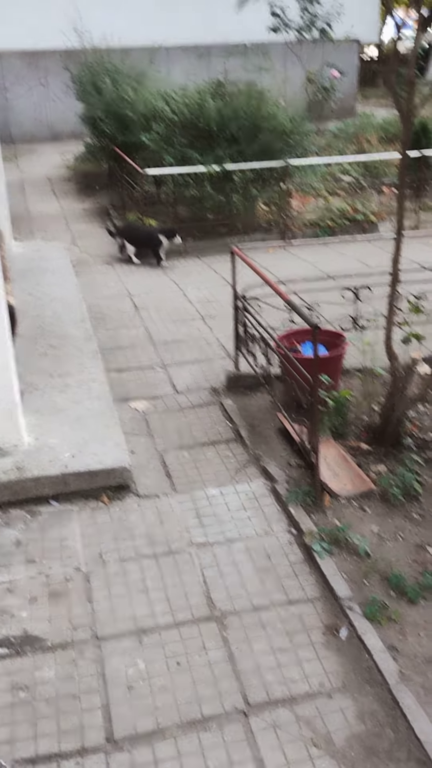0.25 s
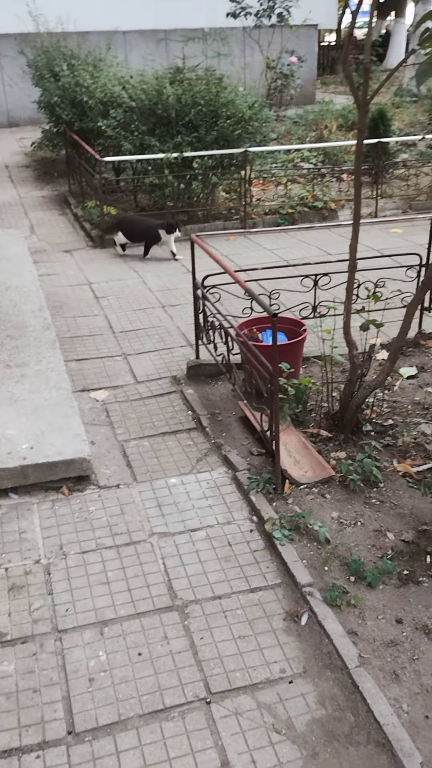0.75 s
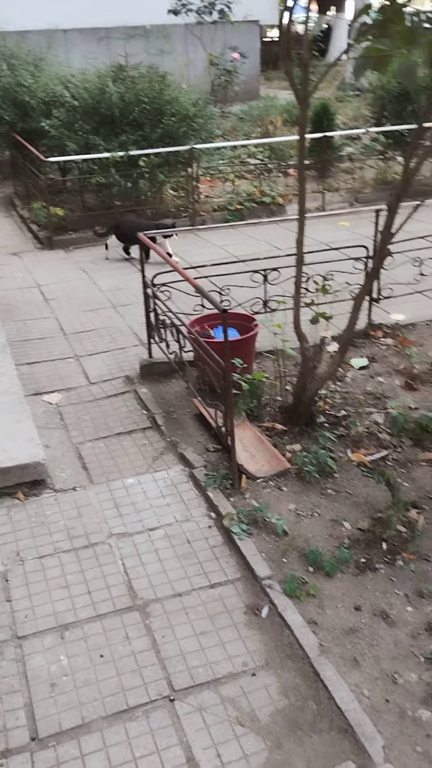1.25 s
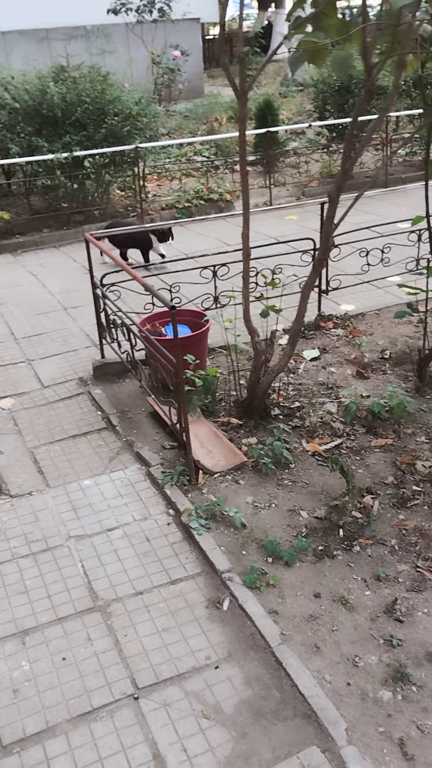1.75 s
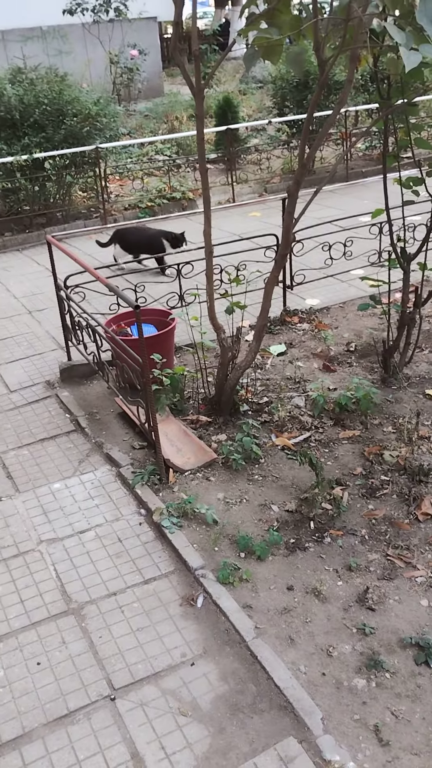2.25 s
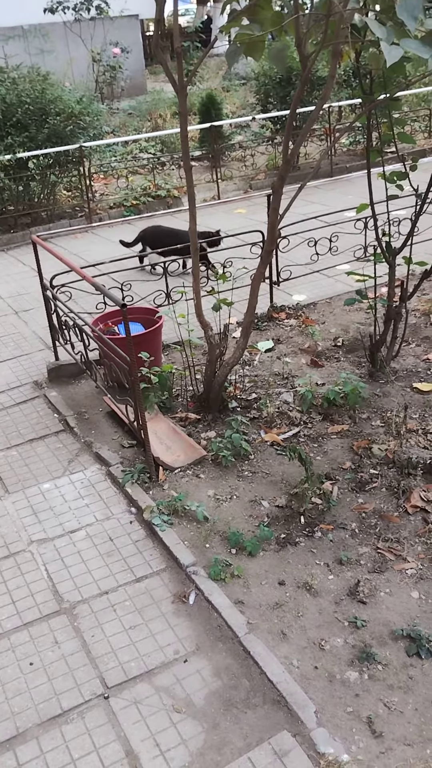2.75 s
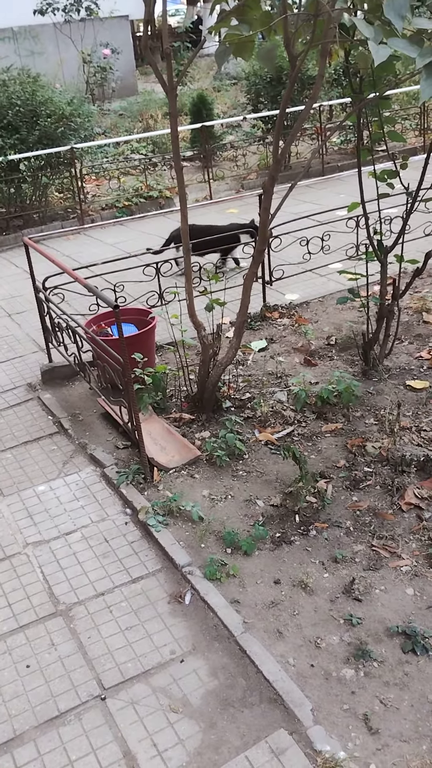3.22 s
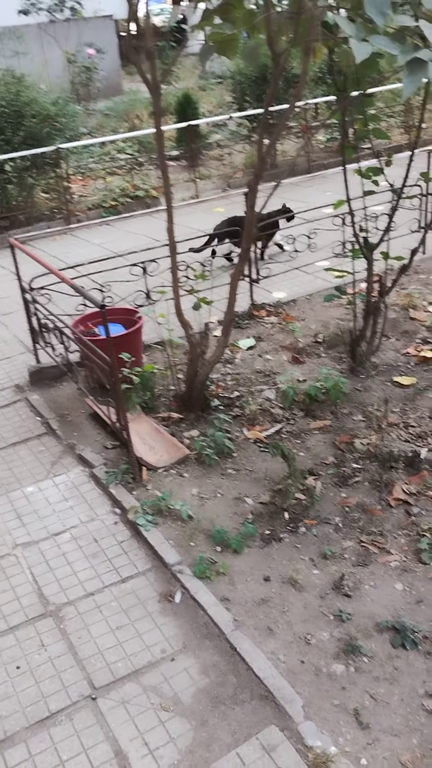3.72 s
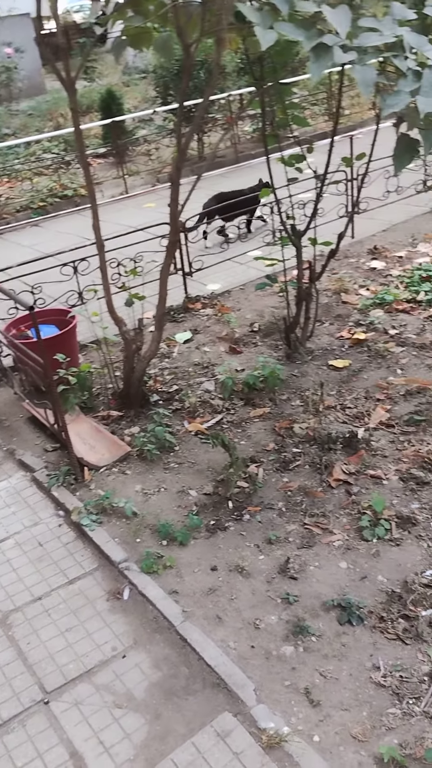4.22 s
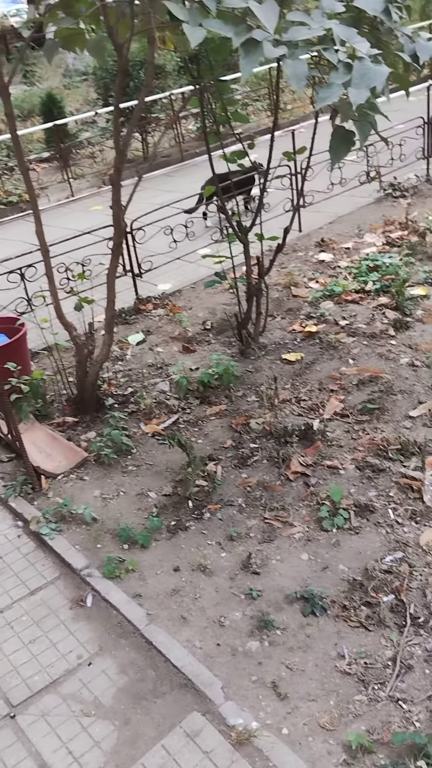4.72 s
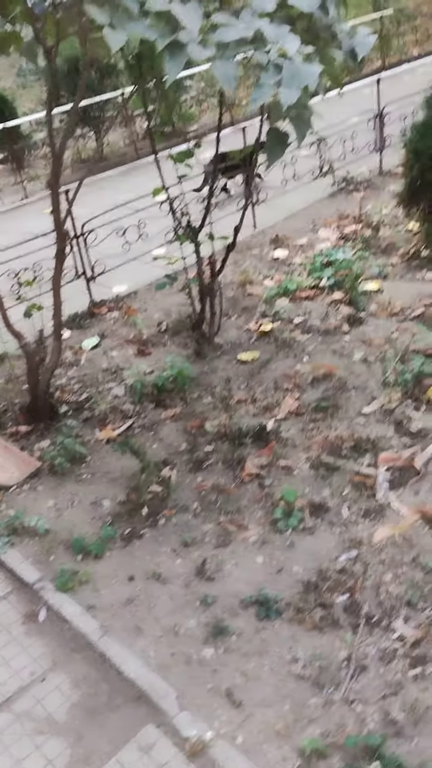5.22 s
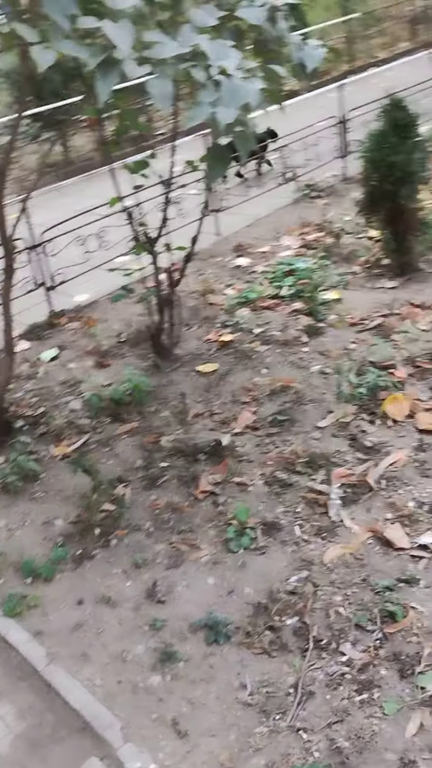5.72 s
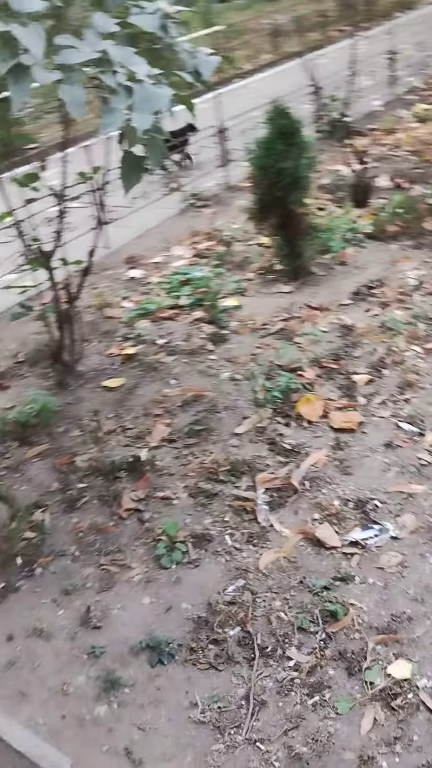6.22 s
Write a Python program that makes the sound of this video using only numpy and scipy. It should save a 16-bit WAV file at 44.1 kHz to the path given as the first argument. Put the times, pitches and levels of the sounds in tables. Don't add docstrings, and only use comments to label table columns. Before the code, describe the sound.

Throughout, distant traffic forms a dark, low rumble with soft tyre roar, slowly swelling and flickering, heard outdoors from a paved courtyard on a hand-held stereo phone. A heavy engine drones weakly in the first half second. From about 0.7 to 2.3 seconds another engine revs up in soft surges, its low hum rising in pitch. A dull finger click lands on the right at 1.5. At 2.3 a bright tick and slips, then around 2.5 a low knock with scratchy touches. The heavy engine's deep throb peaks near 2.55 and stays strong in uneven pulses until about 4, then continues weaker to 5.9. Tiny falling bird cheeps come near 2.9, 3.1 and 3.6, the last clearest; a faint touch at 3.2. Very soft brake hisses appear around 1.5 to 2.7 and from 4.5 onward, with a mild tyre swell after 5.4 as traffic continues.

```python
import sys
import numpy as np
from scipy import signal
from scipy.fft import rfft, irfft
from scipy.io import wavfile
from scipy.ndimage import uniform_filter1d

SR = 44100
rng = np.random.default_rng(int(sys.argv[2]) if len(sys.argv) > 2 else 0)


def master_out(mix):
    frames = np.transpose(np.atleast_2d(mix))
    ceiling = np.clip(frames, -1, 1)
    pcm = np.round(ceiling * 32767).astype(np.int16)
    wavfile.write(sys.argv[1], SR, pcm)


def to_linear_factor(level_db):
    exponent = np.asarray(level_db, float) / 20
    return 10 ** exponent


N = 285643
TIME = np.arange(N) / SR
HZ = np.fft.rfftfreq(N, 1 / SR)

# pitch in Hz, strength in dB per Hz.
AIR_TONE = [(2400, -15), (3200, -8), (4000, -5.5), (5000, -12), (6300, -14), (8000, -17.5), (10000, -21),
            (14500, -22)]
AIR_DB = -67

# start in seconds, length in seconds, start pitch in Hz, end pitch in Hz, level in dB.
CHEEPS = [
    (2.85, 0.02, 7370, 7100, -79),
    (3.125, .021, 7500, 7300, -79),
    (3.558, 0.0446, 7860, 7150, -69),
]

# start in seconds, length in seconds, centre in Hz, width in Hz, level in dB.
HISSES = [(1.5, .42, 6300, 800, -80), (1.73, 0.18, 6000, 1300, -77), (2.2, 0.49, 7900, 730, -81),
          (4.55, 0.79, 4600, 700, -74), (5.45, 1.2, 6000, 2600, -73), (5.8, .25, 9300, 2600, -78),
          (4.4, 3.2, 6650, 4900, -81), (5.294, 1.3, 9976, 7300, -81), (5.4, 1.6, 998, 240, -47),
          (5.551, 0.63, 390.5, 80, -49.5), (-.6, 2.8, 884, 200, -50.5), (4.604, 0.94, 155.2, 14, -56)]

# start in seconds, length in seconds, peak in dB, centre in Hz, width in Hz.
CRACKLES = [
    (2.3144, .0015, -53, 10000, 4000),
    (2.319, .008, -63, 8500, 3000),
    (2.3796, .003, -63, 8000, 4000),
    (2.5078, .002, -59, 12000, 6000),
    (2.536, .002, -57, 9500, 9000),
    (2.5413, .0025, -55, 7500, 10000),
    (2.5464, .002, -56, 9800, 3000),
    (3.196, .0025, -58, 10000, 8000),
]

# start in seconds, peak in dB, ring pitch in Hz, ring width in Hz, left minus right in dB.
TICKS = [
    (1.5087, -38, 6500, 20000, -15),
    (2.3149, -47, 8800, 1800, 0),
    (2.3163, -42, 12800, 3000, 3),
    (2.3165, -36, 10400, 2000, 0),
    (2.3168, -34.5, 8000, 1000, -4),
    (2.5078, -52, 6300, 800, -5),
    (2.5418, -31, 2200, 330, -4),
    (2.5437, -37, 2900, 550, -2),
]

# peak in seconds, rise in seconds, fall in seconds, firing rate in Hz, level in dB.
DRONE_SURGES = [(.05, .1, 0.089, 80.7, -40), (.23, 0.13, .07, 79.1, -35.5), (.5, .05, 0.064, 81.6, -42),
                (2.15, 0.065, 0.0998, 75, -35), (2.39, 0.14, 0.11, 74.66, -31),
                (2.555, .04, .035, 73.4, -25), (2.61, 0.027, .02, 76, -28.5), (2.71, 0.037, .07, 75.5, -29),
                (2.97, 0.12, .08, 75.56, -32), (3.09, .06, .04, 76, -33), (3.2, 0.045, 0.13, 75.3, -30),
                (3.38, 0.15, 0.099, 76.15, -27), (3.69, 0.042, .04, 75.1, -32), (3.78, .06, .08, 74.7, -30),
                (3.89, .07, .14, 74.05, -29.5), (4.23, .07, 0.053, 81.7, -39.5),
                (4.58, 0.045, 0.11, 75.6, -38), (4.79, .04, 0.043, 80, -37.5),
                (4.93, 0.061, .1, 80.3, -36.5), (5.1, 0.089, .14, 80.7, -36.5),
                (5.4, .04, 0.21, 77.4, -39.5), (5.66, 0.17, .08, 77.4, -37), (5.87, .06, .04, 78.3, -40.5)]

# peak in seconds, rise in seconds, fall in seconds, firing rate in Hz, level in dB.
REV_SURGES = [
    (.75, 0.059, .12, 86, -52),
    (.92, 0.061, 0.09, 94.9, -51),
    (1.26, 0.086, 0.16, 103, -37),
    (1.65, 0.11, .14, 125.5, -38),
    (2.15, 0.12, .1, 141.9, -38.5),
]

# multiple of the firing rate, level in dB.
DRONE_ORDERS = [(1, -0.5), (2, -29), (3, -22)]

# pitch in Hz, strength in dB per Hz.
ROAD_TONE = [(22, -31), (32, -13), (42, -5.5), (62, -2), (85, -0.5), (120, -5), (250, -5), (330, -11.5),
             (550, -18), (900, -13), (1800, -19.5), (2600, -27), (3200, -37.5), (4200, -60)]
ROAD_DB = -36.5

# pitch in Hz, shared part from 0 to 1.
LIKENESS = [(40, .93), (180, 0.96), (350, 1), (520, 0.9), (700, 0.5), (1000, .27), (1700, .18), (2200, .3),
            (2900, .06)]

# pitch in Hz, left minus right in dB.
BALANCE = [(60, -4), (91, -2.5), (140, -2.5), (210, 0), (320, -0.5), (490, -4), (750, -3.5), (1140, -2),
           (1730, -3), (2640, -1.5)]

# time in seconds, level in dB.
LOAD = [(0.0, -49.5), (0.03, -48.5), (1.55, -44), (1.62, -49), (2.07, -40.5), (2.16, -45), (2.52, -40.5),
        (4.18, -42.5), (4.22, -49), (4.32, -41.5), (5.53, -45), (5.64, -39), (6.38, -46), (6.47, -41.5)]

SWELL_HZ = (110, 280, 900, 2000)

LOAD_SHARE = (0.25, .9, -.25, -0.061)

PORT_LAG_S = 0.00016
TICK_LAG_S = 0.00022
WAVER_DB = 3.5


def level(x, db):
    return x * to_linear_factor(db) / np.sqrt(np.mean(x ** 2))


def along(table, hz):
    table = np.array(table)
    return np.interp(np.log(np.maximum(hz, 1)), np.log(table[:, 0]), table[:, 1])


def walk(rate):
    k = int(SR / rate)
    steps = np.repeat(rng.standard_normal(N // k + 1), k)
    return 1.36 * uniform_filter1d(uniform_filter1d(steps, k), k)[:N]


def ports(mono, pan_db, lag_s):
    late = irfft(rfft(mono) * np.exp(-2j * np.pi * HZ * lag_s), N)
    return np.array([mono * to_linear_factor(pan_db / 2), late * to_linear_factor(-pan_db / 2)])


def air():
    octaves = np.log2(np.maximum(HZ, 1) / 4800)
    tilt = to_linear_factor(np.array([[-.41], [.41]]) * octaves)
    tone = to_linear_factor(along(AIR_TONE, HZ)) * (HZ > AIR_TONE[0][0])
    noise = irfft(rfft(rng.standard_normal((2, N))) * tone * tilt, N)
    return level(noise, AIR_DB)


def bird():
    out = np.zeros(N)
    for s, length, start_hz, end_hz, db in CHEEPS:
        u = np.clip((TIME - s) / length, 0, 1)
        hz = start_hz + (end_hz - start_hz) * u ** 1.5
        whistle = np.sin(2 * np.pi * np.cumsum(hz) / SR)
        out += to_linear_factor(db) * np.sin(np.pi * u) * whistle
    return ports(out, 0, .0001)


def hisses():
    out = 0
    for s, length, hz, width, db in HISSES:
        shape = np.exp(-(2 * (HZ - hz) / width) ** 2)
        band = irfft(rfft(rng.standard_normal((2, N))) * shape, N)
        swell = np.sin(np.pi * np.clip((TIME - s) / length, 0, 1)) ** 0.9
        flutter = to_linear_factor(1.5 * walk(14))
        out = out + level(band, db) * swell * flutter
    return out


def crackles():
    out = np.zeros((2, N))
    hz_axis = np.fft.rfftfreq(1024, 1 / SR)
    for s, length, db, hz, width in CRACKLES:
        shape = np.exp(-(2 * (hz_axis - hz) / width) ** 4)
        grit = irfft(rfft(rng.standard_normal((2, 1024))) * shape, 1024)
        u = 3 * np.arange(1024) / SR / length
        i = int(s * SR)
        out[:, i:i + 1024] += level(grit, db - 5) * u * np.exp(1 - u)
    return out


def ticks():
    out = np.zeros((2, N))
    t = np.arange(1024) / SR
    for s, db, hz, width, pan_db in TICKS:
        i = int(s * SR)
        for side, lag in enumerate((0, TICK_LAG_S)):
            u = np.maximum(t - lag, 0) * np.pi * width
            ring = u * np.exp(1 - u) * np.sin(2 * np.pi * hz * (t - lag))
            out[side, i:i + len(t)] += ring * to_linear_factor(db + (.5 - side) * pan_db)
    return out


def engine(surges, orders, wobble):
    s, rise, fall, hz, db = np.transpose(surges)[:, :, None]
    firing_hz = np.interp(TIME, s[:, 0], hz[:, 0]) * (1 + wobble * walk(9))
    phase = 2 * np.pi * np.cumsum(firing_hz) / SR
    tone = 0
    for k, order_db in orders:
        waver = WAVER_DB * (k > 1) * walk(6)
        tone = tone + to_linear_factor(order_db + waver) * np.sin(k * phase)
    bells = to_linear_factor(db) * np.exp(-((TIME - s) / np.where(TIME < s, rise, fall)) ** 2)
    swell = np.sqrt(np.sum(bells ** 2, axis=0))
    return ports(np.sqrt(2) * tone * swell, -2.7, .0007)


def road_noise():
    share = np.clip(along(LIKENESS, HZ), 0, 1)
    common, left, right = rfft(rng.standard_normal((3, N)))
    pan = to_linear_factor(along(BALANCE, HZ) / 2)
    shared = np.sqrt(share) * common
    late = shared * np.exp(-2j * np.pi * HZ * PORT_LAG_S)
    own = np.sqrt(1 - share)
    both = np.array([(shared + own * left) * pan, (late + own * right) / pan])
    return both * to_linear_factor(along(ROAD_TONE, HZ)) * (HZ < ROAD_TONE[-1][0])


def road():
    both = road_noise()
    load = np.interp(TIME, *np.transpose(LOAD))
    swell = [part * (load - np.mean(load)) for part in LOAD_SHARE]
    out = 0
    for step in range(16):
        hz = 25 * 2 ** (step / 2)
        away = np.clip(2 * np.log2(np.maximum(HZ, 1) / hz), -1, 1)
        band = np.cos(np.pi / 2 * away) ** 2
        place = np.interp(np.log(hz), np.log(SWELL_HZ), np.arange(4))
        low = min(int(place), 2)
        part = place - low
        flicker = .4 * walk(1.5)
        db = (1 - part) * swell[low] + part * swell[low + 1] + flicker
        out = out + irfft(both * band, N) * to_linear_factor(db)
    return level(out, ROAD_DB)


def scene():
    drone = engine(DRONE_SURGES, DRONE_ORDERS, .004)
    rev = engine(REV_SURGES, [(1, -5), (2, -20.5)], .0082)
    return air() + bird() + hisses() + crackles() + ticks() + drone + rev + road()


def roll_off(x):
    return signal.sosfilt(signal.butter(12, 14240, fs=SR, output="sos"), x)


def record(dry):
    return roll_off(dry)


dry = scene()
out = record(dry)
master_out(out)
```